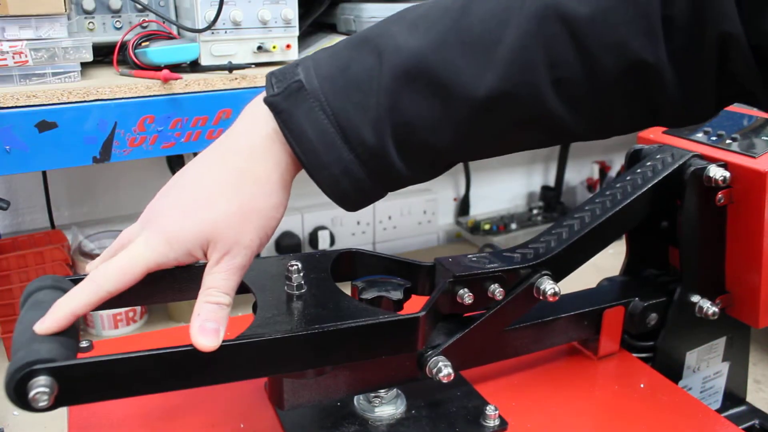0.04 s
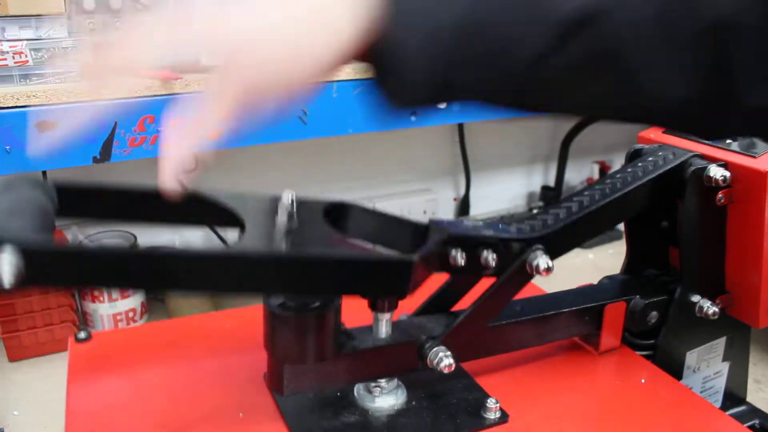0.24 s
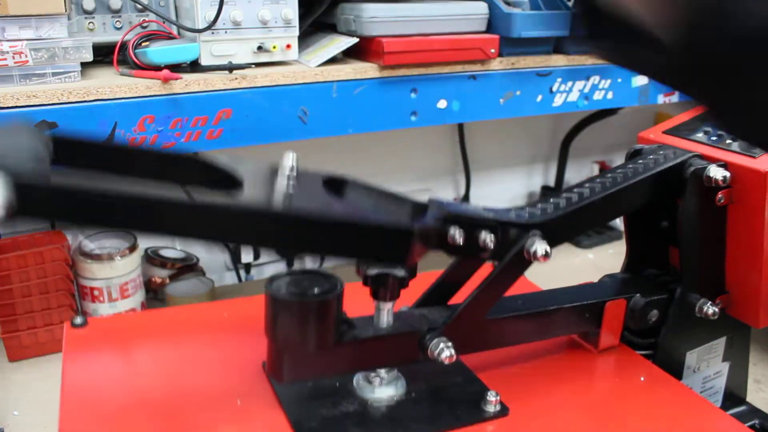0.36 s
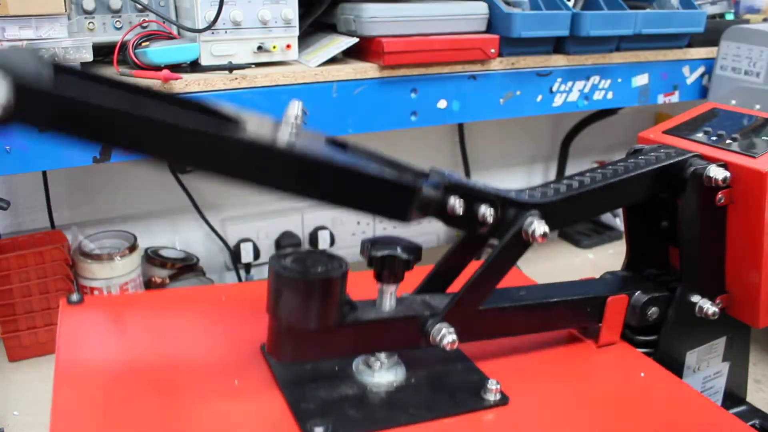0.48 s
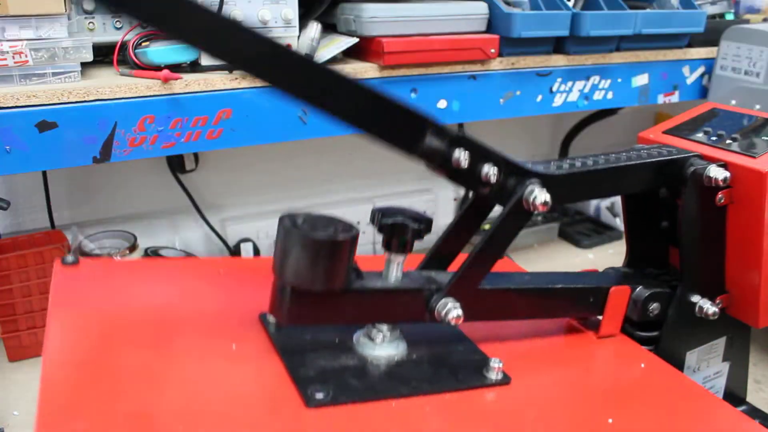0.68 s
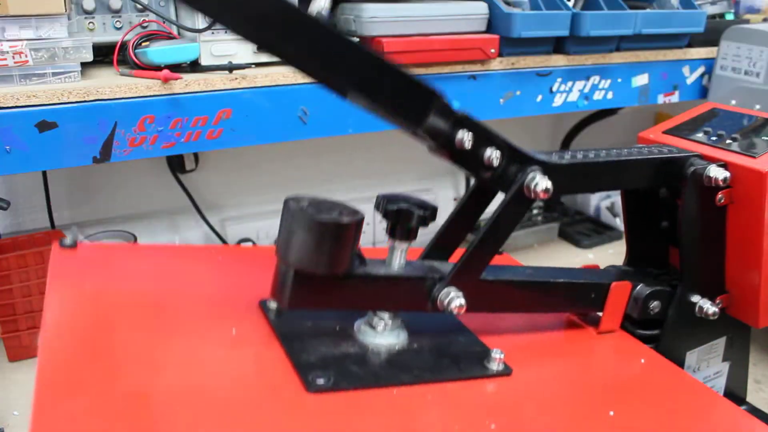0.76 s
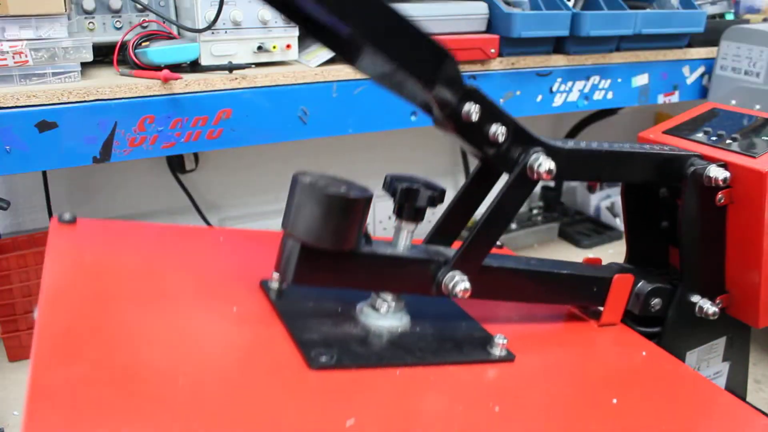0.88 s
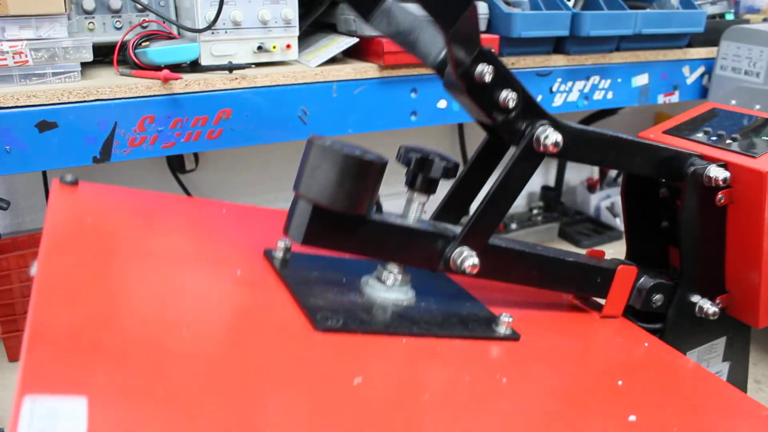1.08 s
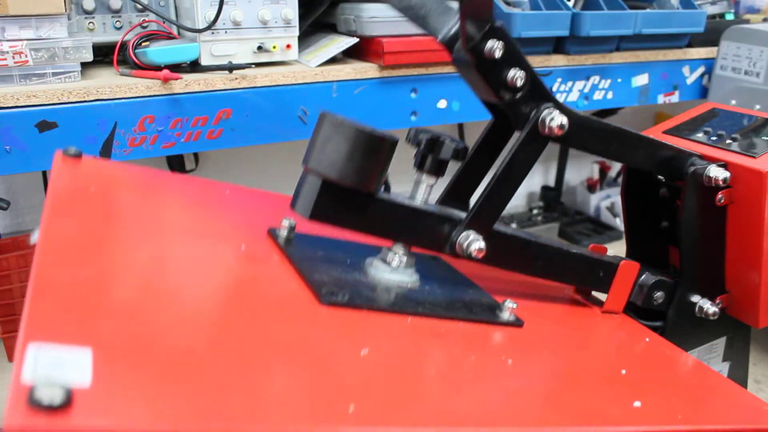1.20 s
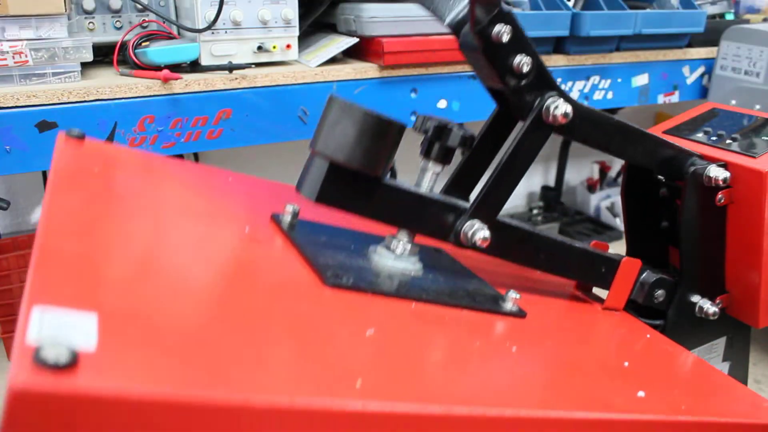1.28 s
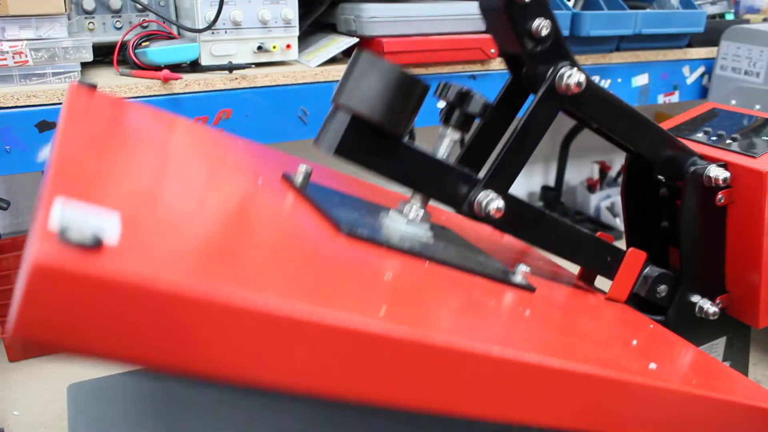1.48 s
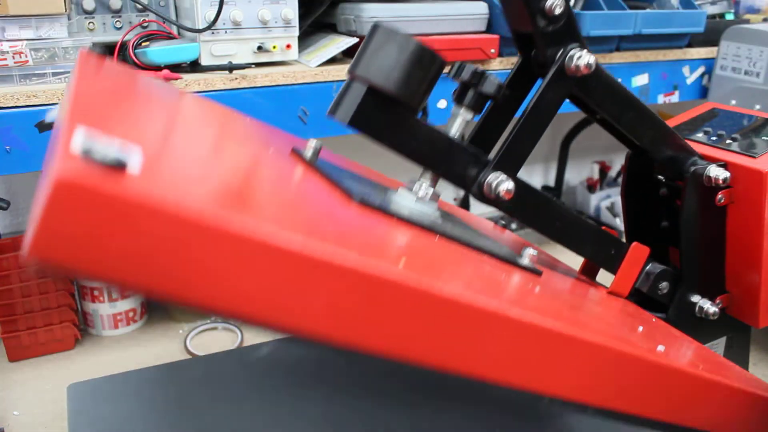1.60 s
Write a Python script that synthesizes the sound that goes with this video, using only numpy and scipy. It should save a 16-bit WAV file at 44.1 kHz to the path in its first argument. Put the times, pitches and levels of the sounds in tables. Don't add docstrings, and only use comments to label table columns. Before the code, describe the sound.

Close up in a quiet workshop, a metal press releases with a sharp clipping clunk, rattles as it swings up, clicks at pin and linkage, squeaks briefly, hisses faintly and ends with a soft stop knock.

```python
import sys
import numpy as np
from scipy import signal
from scipy.fft import rfft, irfft
from scipy.io import wavfile
from scipy.ndimage import uniform_filter1d

SR = 44100
rng = np.random.default_rng(int(sys.argv[2]) if len(sys.argv) > 2 else 0)


def dump_mix(stems):
    frames = np.atleast_2d(stems).T
    limited = np.clip(frames, -1, 1)
    pcm = np.round(limited * 32767).astype(np.int16)
    wavfile.write(sys.argv[1], SR, pcm)


def nominal_scale(level):
    x = np.asarray(level, float) / 20
    return 10 ** x


N = 72765

# frequency in Hz, time to fall 60 dB in seconds.
ROOM_DECAY = [(70, 1), (200, 0.57), (1000, 0.92), (4000, 0.51), (12000, 0.46)]
# frequency in Hz, density in dB per Hz.
AIR_SPECTRUM = [(15, -14), (25, 3), (253, -7.5), (421, -8.5), (552, -12), (871, -11), (1530, -18),
                (2170, -20), (15500, -45)]
# time in seconds, pitch in Hz, level in dB.
BENCH_DRONE = [(.2, 121.6, -63), (.225, 117.8, -31), (.27, 116.4, -26), (.31, 112, -28), (.33, 110.5, -41),
               (.39, 111.2, -41), (.47, 81.5, -45), (.55, 81.9, -76), (.8, 110.8, -60), (.9, 115.6, -48),
               (1.0, 104, -60), (1.35, 114, -64), (1.5, 115.3, -49.5), (1.65, 112, -64)]
# time in seconds, level in dB.
SWING_LEVEL = [(.1, -73), (.15, -53), (.3, -43.5), (.5, -49.5), (.65, -47), (.78, -46), (.84, -62),
               (1.1, -76), (1.3, -62), (1.65, -52.5)]
# frequency in Hz, density in dB per Hz.
SHUDDER_SPECTRUM = [(24, -32), (40, -43), (294, 4), (798, -8.5), (1980, -6), (3300, -9.5), (8000, -21.5),
                    (10400, -62), (17600, -120)]
# time in seconds, level in dB.
RATTLE_LEVEL = [(.2, -80), (.22, -35), (.3, -39.5), (.4, -40.5), (.48, -46.5), (.56, -60), (.75, -59),
                (.85, -72)]
# frequency in Hz, bandwidth in Hz, level in dB.
PLATEN_RESONANCES = [(71, 7.8, 5.5), (427, 19, 0), (948, 69, 3.5), (1250, 75, -2), (1598, 37, -0.5),
                     (1790, 82, -14.5), (2000, 85, -18), (2530, 140, -23), (2950, 99, -22), (3970, 110, -8),
                     (4640, 330, -10)]
# time in seconds, hiss level in dB.
GAS_FLOW = [(.2, -64), (.4, -60.5), (.7, -54), (1.0, -58), (1.2, -57.5), (1.35, -59), (1.65, -58.5)]
# frequency in Hz, bandwidth in Hz, level in dB.
STRUT_RESONANCES = [(4630, 260, 3), (6860, 300, 6), (8900, 330, 5), (11650, 260, 1), (12200, 500, -3),
                    (9700, 14000, 14)]
# time in seconds, pitch in Hz, level in dB.
VALVE_WHISTLE = [(.78, 5350, -80), (.8, 5320, -61), (.87, 5200, -61), (.9, 4950, -74), (.95, 4850, -66),
                 (1.02, 4680, -64), (1.08, 4600, -67), (1.105, 4440, -74), (1.12, 4400, -57),
                 (1.27, 4130, -60), (1.295, 4080, -69), (1.315, 4030, -58), (1.375, 3950, -58),
                 (1.39, 3870, -67), (1.42, 3810, -59), (1.49, 3680, -61), (1.535, 3600, -71),
                 (1.6, 3510, -58), (1.65, 3440, -61)]
# time in seconds, pitch in Hz, level in dB.
SEAL_SQUEAL = [(.5, 12600, -89), (.56, 12400, -66), (.63, 12100, -68), (.72, 12200, -76), (.8, 11800, -82),
               (1.1, 12300, -85), (1.15, 12300, -68.5), (1.19, 11950, -61.5), (1.22, 12300, -65),
               (1.28, 12700, -67), (1.32, 12400, -89)]
# time in seconds, pitch in Hz, level in dB.
HINGE_SQUEAK = [(.612, 3150, -66), (.62, 3050, -44), (.63, 2900, -50), (.645, 2870, -52), (.665, 2870, -40),
                (.673, 2820, -49), (.68, 2620, -44), (.69, 2450, -55), (.7, 2400, -75)]

# start in seconds, level in dB, contact time in ms.
LATCH_HITS = [(.1718, -34, 0.026), (.1735, -28.5, 0.013), (.178, -31.5, 0.074), (.183, -30.5, 0.022),
              (.188, -29.5, 0.057), (.1975, -34, 0.035)]
CLUNK_HITS = [
    (.1962, -15.5, 0.99),
    (.2002, -17.5, 0.093),
    (.2039, -8.5, 0.0086),
    (.2049, 3, 0.079),
    (.2068, -7, 0.022),
    (.2105, -14, 0.06),
    (.2185, -17.5, 0.11),
    (.234, -15.5, 0.18),
]
PIN_HITS = [(.5019, -49, 0.02), (.5026, -25, 0.021), (.506, -27.5, 0.0337), (.5095, -28.5, 0.074),
            (.516, -33, 0.068), (.527, -35, 0.13)]
LINK_HITS = [
    (.7635, -35.5, 0.045),
    (.771, -52, 0.043),
    (.7745, -40, 0.19),
]
STOP_HITS = [(1.3338, -45, 0.027), (1.3358, -30.5, 0.02), (1.3398, -28, 0.16), (1.3445, -34.5, 0.097),
             (1.351, -35.5, .1), (1.365, -39.5, 0.052), (1.382, -37, .2), (1.516, -46, 0.021)]
# frequency in Hz, level in dB, time to fall 60 dB in seconds.
LATCH_MODES = [(4592, -6, .018), (7800, -1, .02), (11800, -6, .015)]
CLUNK_MODES = [(133, -11.5, 0.093), (213.4, 1.5, 0.06), (365, 0.5, 0.057), (483, -4.5, 0.042),
               (682, -9.5, 0.046), (795, 0, 0.055), (923, -3.5, 0.06), (973, -8, 0.059), (1172, -7, 0.048),
               (1266, -10.5, 0.083), (1554, -6, 0.045), (1802, 1.5, 0.029), (2620, -8.5, 0.047),
               (4423, 4, 0.017)]
PIN_MODES = [(1970, -7.5, 0.061), (2259.6, -8, 0.05), (2844, -9, 0.07), (3510, -6, .04), (4201, -16, 0.046),
             (5080, 3, 0.04), (6680, 0, 0.035), (7320, -6, 0.023), (7800, -3.5, 0.036), (9500, 2.5, 0.066),
             (11600, -13, .035)]
LINK_MODES = [(293, 1, 0.099), (1075, 1.5, 0.12), (1219, 7, 0.026), (2500, -29, .08), (3376, 12.5, 0.033),
              (3620, -6, .04), (3830, -12, 0.046)]
STOP_MODES = [(284, 0.5, 0.073), (646, -12, 0.11), (1004, -7, 0.09), (1590, -17, .05), (2030, -18, 0.066),
              (2200, -7, 0.035), (2400, -14, .06), (2660, -16, .06), (3187, 2.5, 0.042), (3442, -1, .03),
              (3590, -6, .025), (4440, -6, 0.027)]
# frequency in Hz, density in dB per Hz.
LATCH_CRACK = [(180, -52), (300, -9), (2520, -10.5), (3340, -3.5), (4140, -8), (7750, -3), (15500, -18)]
CLUNK_CRACK = [(100, -72), (300, 6.5), (800, -1), (1900, -6), (2840, -14.5), (4320, -6.5), (9000, -21),
               (12500, -26.5), (15500, -30)]
PIN_CRACK = [(590, -45), (1500, -30), (2200, -3), (3490, 6), (4540, 4), (9800, 4.5), (11000, -3.5),
             (15500, -3)]
LINK_CRACK = [(150, -35), (400, -26.5), (1130, 2), (1900, -25), (3500, 10), (5000, -20), (8000, -38),
              (17000, -80)]
STOP_CRACK = [(120, -34), (280, -0.5), (1000, -2), (2000, -2.5), (3300, -2.5), (4700, -9.5), (7000, -46),
              (17000, -80)]
# crack in dB, crack's 60 dB decay in seconds, room in dB, first tick in dB.
LATCH_MIX = (5.5, 0.065, -25, 0)
CLUNK_MIX = (3, 0.0458, -14, 3.5)
PIN_MIX = (3.5, 0.0971, -9, 11.5)
LINK_MIX = (8.5, 0.154, -4, -4)
STOP_MIX = (2, 0.07, -5.5, -8)


def evened(x):
    return x / np.sqrt(np.mean(x ** 2) + 1e-20)


def read(points, hz):
    f, value = np.transpose(points)
    return np.interp(np.log(hz + 1), np.log(f + 1), value)


def along(rows, column):
    rows = np.array(rows)
    return np.interp(np.arange(N) / SR, rows[:, 0], rows[:, column])


def filtered(x, spectrum):
    gain = nominal_scale(read(spectrum, np.fft.rfftfreq(len(x), 1 / SR)))
    return evened(irfft(rfft(x) * gain, len(x)))


def patchy(spectrum, patchy_db, flicker_db):
    frames = N // 128 + 5
    real, imaginary, patches = rng.standard_normal((frames, 257, 3)).T
    patches = uniform_filter1d(patches, size=6, axis=0)
    patches = evened(uniform_filter1d(patches, size=16, axis=1))
    flicker = evened(uniform_filter1d(rng.standard_normal(frames), size=4))
    gain = nominal_scale(patchy_db * patches + flicker_db * flicker)
    fine = signal.istft((real + 1j * imaginary) * gain, nperseg=512, noverlap=384)[1][:N]
    return filtered(fine, spectrum)


def resonate(x, hz, width):
    turn = np.exp(2j * np.pi * np.cumsum(hz * np.ones(len(x))) / SR)
    r = np.exp(-np.pi * width / SR)
    return 2 * (turn * signal.lfilter([1 - r], [1, -r], x / turn)).real


def resonances(x, rows):
    return evened(sum(nominal_scale(db) * evened(resonate(x, hz, width)) for hz, width, db in rows))


def tone(rows, width_hz, clean):
    hz = along(rows, column=1)
    breath = resonate(rng.standard_normal(N), hz, width_hz)
    breath = evened(resonate(breath, hz, width_hz))
    steady = np.sqrt(2) * np.sin(2 * np.pi * np.cumsum(hz) / SR)
    return nominal_scale(along(rows, column=2)) * (clean * steady + (1 - clean) * breath)


def room(x):
    taps = np.zeros(SR)
    at = np.arange(20, SR - 20, 20)
    taps[at + rng.integers(0, 20, len(at))] = rng.choice([-1., 1.], len(at))
    hz, t, z = signal.stft(taps, SR, nperseg=512)
    decay = nominal_scale(-60 * t / read(ROOM_DECAY, hz)[:, None])
    tail = signal.istft(z * decay, SR, nperseg=512)[1]
    return signal.fftconvolve(x, tail / np.linalg.norm(tail))[:N]


def room_air():
    return nominal_scale(-49) * patchy(AIR_SPECTRUM, patchy_db=.9, flicker_db=.6)


def bench_drone():
    return tone(BENCH_DRONE, width_hz=35, clean=.55)


def swing_shudder():
    return nominal_scale(along(SWING_LEVEL, column=1)) * patchy(SHUDDER_SPECTRUM, patchy_db=2.5, flicker_db=-1.5)


def platen_rattle():
    shake = patchy([(100, 0), (3000, 0), (6000, -20), (16000, -50)], patchy_db=2.5, flicker_db=2.5)
    return nominal_scale(along(RATTLE_LEVEL, column=1)) * resonances(shake, PLATEN_RESONANCES)


def gas_strut():
    gas = patchy([(100, -20), (3000, 0), (16000, 0)], patchy_db=1.6, flicker_db=.7)
    hiss = nominal_scale(along(GAS_FLOW, column=1)) * resonances(gas, STRUT_RESONANCES)
    third_harmonic = tone(np.array(VALVE_WHISTLE) * [1, 3, 1], width_hz=500, clean=0)
    whistle = tone(VALVE_WHISTLE, width_hz=110, clean=.68)
    squeal = tone(SEAL_SQUEAL, width_hz=450, clean=0)
    return hiss + whistle + nominal_scale(-19) * third_harmonic + squeal


def hinge_squeak():
    return nominal_scale(3) * tone(HINGE_SQUEAK, width_hz=260, clean=.6)


def struck(hits, modes, crack, mix):
    crack_db, crack_t60, room_db, tick_db = mix
    tick_t60, rise_s, ring_to_room = .004, .0003, 0.44
    t = np.arange(SR // 2) / SR
    direct, sent = np.zeros(N + SR), np.zeros(N + SR)
    hz, db, t60 = np.array(modes).T[:, :, None]
    t60 = np.minimum(t60, 125 / np.minimum(hz, 2000))
    pulse = irfft(nominal_scale(read(crack, np.fft.rfftfreq(len(t), 1 / SR))), len(t))
    pulse = np.roll(pulse, shift=400)
    pulse = 10 * pulse / np.linalg.norm(pulse)
    fade = nominal_scale(crack_db - 60 * t / crack_t60) + nominal_scale(tick_db - 60 * t / tick_t60)
    fade = fade * np.minimum(t / rise_s, 1)
    for start_s, hit_db, contact_ms in hits:
        level = nominal_scale(db + rng.standard_normal(hz.shape) - 60 * t / t60)
        ring = (level * np.sin(2 * np.pi * hz * t)).sum(0)
        snap = filtered(rng.standard_normal(len(t)), crack) * fade
        r = np.exp(-2 / (max(contact_ms, .001) * SR / 1000))
        both = [ring + snap, pulse + ring_to_room * ring]
        near, to_room = nominal_scale(hit_db - 8) * signal.lfilter([(1 - r) ** 2], [1, -2 * r, r * r], both)
        at = round(start_s * SR)
        direct[at:at + len(t)] += near
        sent[at:at + len(t)] += to_room
    return direct[:N] + nominal_scale(room_db) * room(sent[:N])


def blows():
    return (struck(LATCH_HITS, LATCH_MODES, LATCH_CRACK, LATCH_MIX)
            + struck(CLUNK_HITS, CLUNK_MODES, CLUNK_CRACK, CLUNK_MIX)
            + struck(PIN_HITS, PIN_MODES, PIN_CRACK, PIN_MIX)
            + struck(LINK_HITS, LINK_MODES, LINK_CRACK, LINK_MIX)
            + struck(STOP_HITS, STOP_MODES, STOP_CRACK, STOP_MIX))


def scene():
    impacts = blows()
    squeak = hinge_squeak()
    swing = swing_shudder()
    air = room_air()
    squeak = squeak + nominal_scale(-15) * room(squeak)
    mix = impacts + squeak + swing + platen_rattle() + gas_strut() + air + bench_drone()
    return mix[None]


def roll_off(x):
    return signal.sosfilt(signal.butter(12, 15660, fs=SR, output="sos"), x)


def record(dry):
    low_cut_hz, edge_hz, ceiling = 95, 15600, 1.0
    thin = signal.sosfilt(signal.butter(3, low_cut_hz, "high", fs=SR, output="sos"), dry)
    clipped = np.clip(thin, -ceiling, ceiling)
    edge = signal.firwin(301, edge_hz, window=("kaiser", 8), fs=SR)
    return roll_off(signal.oaconvolve(clipped, edge[None], "same"))


dry = scene()
out = record(dry)
dump_mix(out)
```